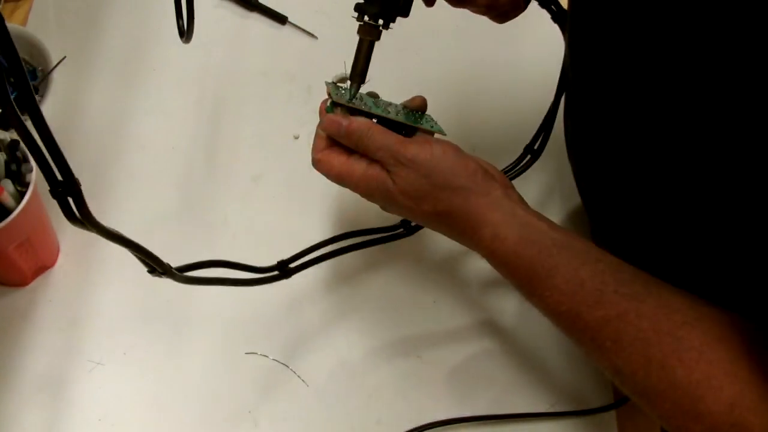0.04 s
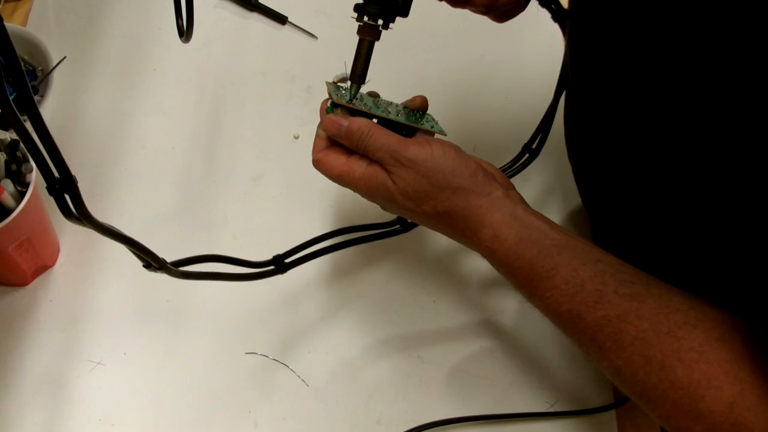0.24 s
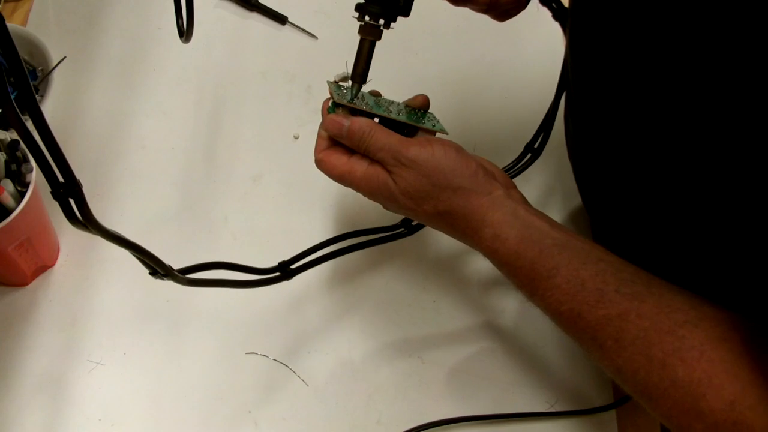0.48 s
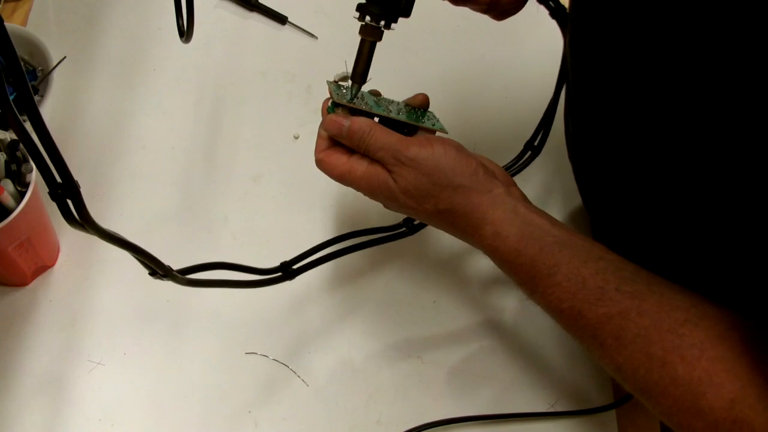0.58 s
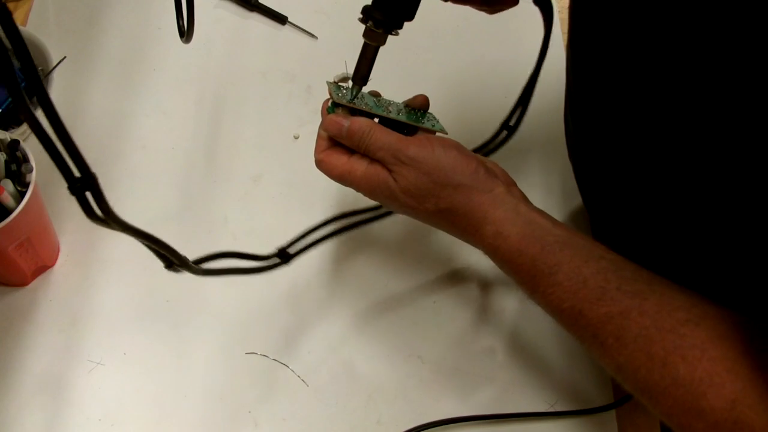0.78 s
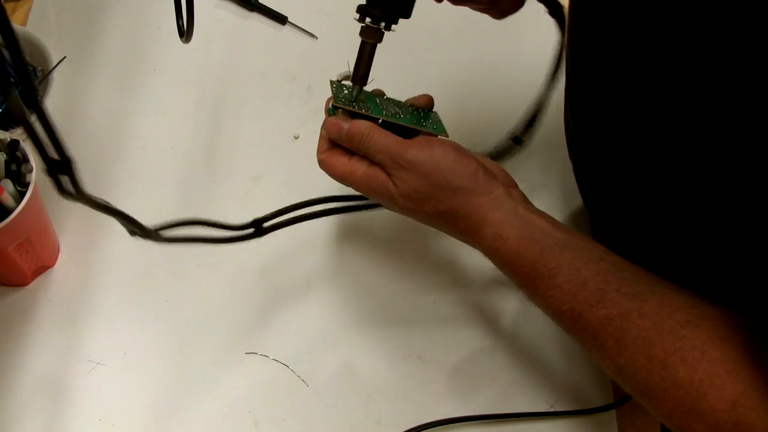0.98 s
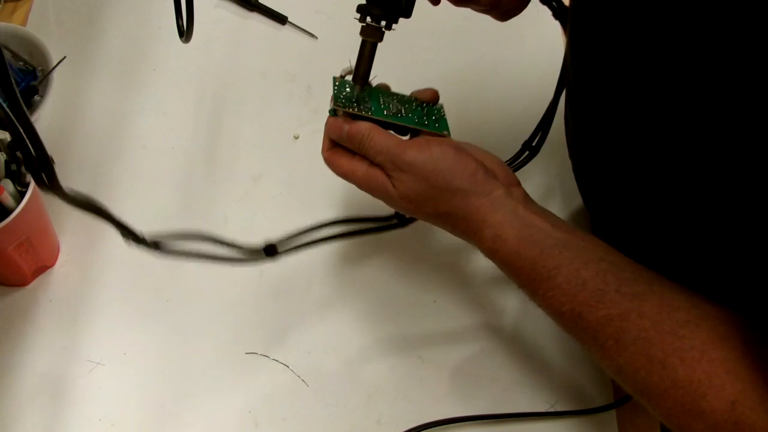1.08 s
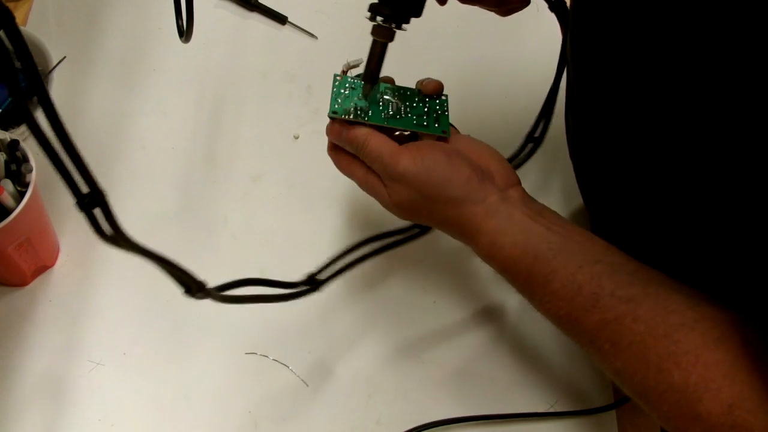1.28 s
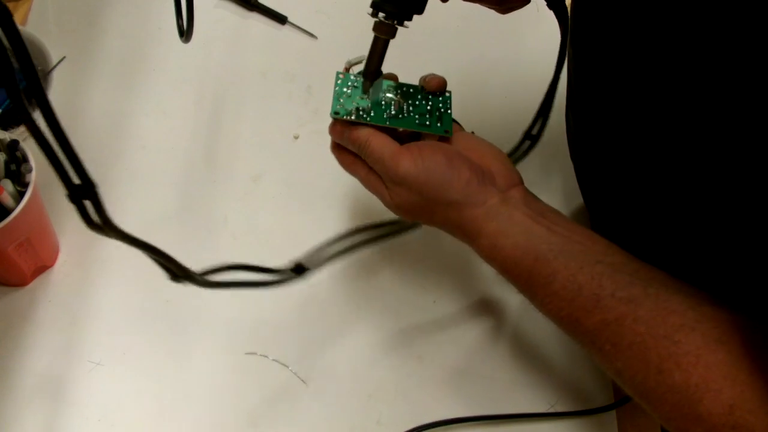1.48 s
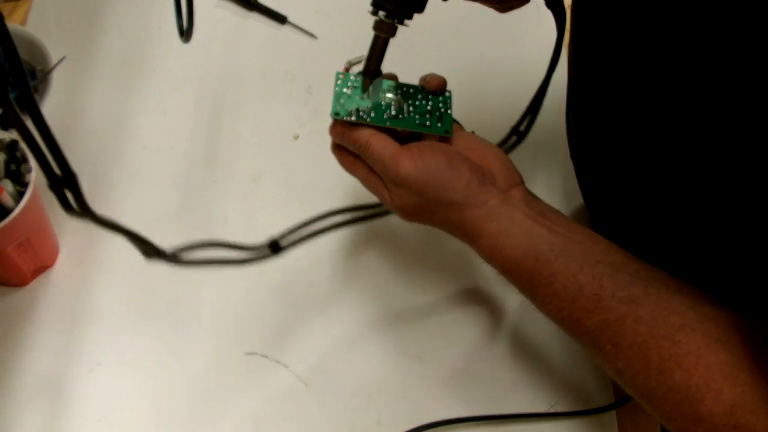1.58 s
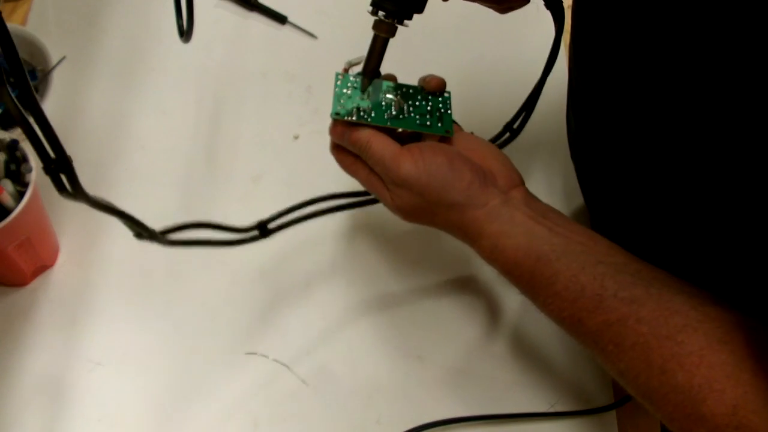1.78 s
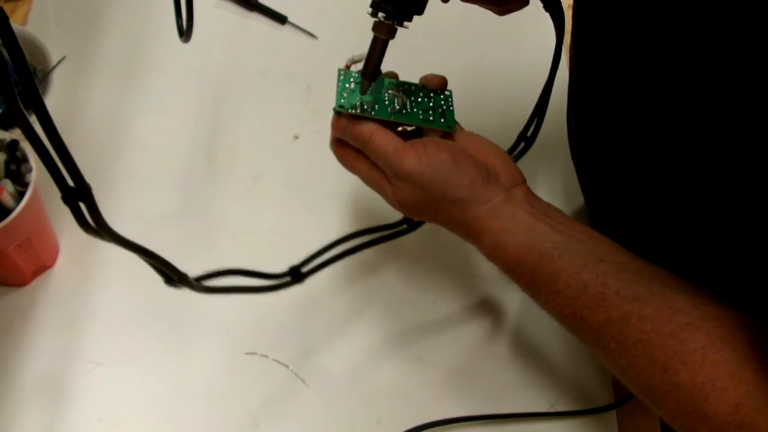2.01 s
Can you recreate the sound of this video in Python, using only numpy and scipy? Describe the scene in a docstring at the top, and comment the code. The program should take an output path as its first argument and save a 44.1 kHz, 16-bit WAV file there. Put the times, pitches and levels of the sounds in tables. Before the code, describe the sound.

Close stereo pickup in a small quiet workshop: a desoldering pump's trigger ticks and snaps, its motor buzzes steadily while air hisses into the nozzle, then it snaps off and leftover suction sighs away, thin and high.

```python
"""A mains-driven desoldering pump buzzes for under a second: a harmonic series plus a gated rattle.
Air hisses into its nozzle, as shaped noise; the leftover vacuum bleeds away in falling whistles.
The trigger ticks, snaps on and snaps off, as decaying modes with a crack of noise.
Behind lie faint bench knocks, a sine of transformer hum and the noise floor of a small quiet workshop."""
import sys
import numpy as np
from scipy import signal
from scipy.io import wavfile
from scipy.ndimage import uniform_filter1d

SR = 44100
rng = np.random.default_rng(int(sys.argv[2]) if len(sys.argv) > 2 else 0)


def store_pcm(level_fs):
    """Save levels as 16-bit WAV."""
    pcm = np.round(np.clip(level_fs, -1, 1) * 32767).astype(np.int16)
    wavfile.write(sys.argv[1], SR, np.atleast_2d(pcm).T)


def makeup_ratio(level_db):
    """Linear amplitude ratio for a level in decibels (20 dB per factor of ten)."""
    decades = np.asarray(level_db, float) / 20
    return 10 ** decades


N = 90404  # samples

MAINS_HZ = 60.02
# Pump envelope: t/s, buzz level/dB, rattle level/dB
PUMP_LEVELS = [(.228, -91, -76), (.25, -57, -54.5), (.27, -50.5, -51), (.3, -45.5, -56), (.4, -47.5, -58.5),
               (.5, -47, -62.5), (.6, -47.5, -61.5), (1.11, -48, -63), (1.135, -64, -62),
               (1.165, -64.5, -77), (1.2, -71.5, -68), (1.25, -88, -86)]
# The diaphragm overshoots as it starts and sags as it is released: t/s, share of full speed
PUMP_SPEED = [(.228, 1.15), (.26, 1.04), (.3, 1), (1.1, 1), (1.135, .95), (1.16, 1)]
# Buzz partials: multiple of the mains, level/dB
BUZZ_PARTIALS = [(1, -39), (2, 0), (3, -23.5), (4, -13), (5, -18.5), (6, -14.5), (7, -25.5), (8, -22.5),
                 (9, -31), (10, -28), (11, -22.5), (12, -19), (13, -17.5), (14, -13), (15, -34), (16, -21),
                 (17, -42), (18, -26), (19, -18.5), (20, -18.5), (21, -25), (22, -41), (23, -35), (24, -57),
                 (25, -52), (26, -39), (27, -12), (28, -25), (29, -22.5), (30, -25), (31, -19), (32, -48),
                 (33, -32), (34, -28), (35, -20.5), (36, -26)]
# Upper partials shift in level while the pump runs; most are strongest at the start, the late ones
# dip and then return: t/s, level change of most/dB, level change of the late ones/dB
UPPER_SHIFT = [(.25, 4, -1), (.33, -3, -4.5), (.4, 1.5, -16), (.48, -1, -12), (.56, 0.5, -1.5),
               (.62, 1, -1), (1.1, -1.5, 2)]
# Partials that follow the late column: multiple of the mains
LATE_PARTIALS = (14, 27, 35)
SHIFT_FROM, WAVER_DB = 9.5, 1.5  # partials above this multiple shift and waver; rms waver
# Loose rattle of the housing: f/Hz, width of one pass/Hz, level/dB
RATTLE_MODES = [(70, 75, -30), (320, 186, -8), (835, 300, -4.5), (1160, 130, -4.5), (1632, 98, -5),
                (1834, 240, -2.5), (2720, 650, -2.5)]
RATTLE_GATE = 0.1  # depth of modulation
PUMP_ROOM_DB, PUMP_ROOM_HZ = -15, 278  # the bass of the pump stays dry

# Air at the nozzle: t/s, broad hiss level/dB, treble level/dB
AIR_LEVELS = [(.222, -93, -72), (.235, -78, -70), (.26, -49.5, -52), (.32, -50.5, -43), (.55, -50.5, -42.5),
              (.86, -52.5, -44.5), (1.04, -50.5, -43), (1.07, -47, -40.5), (1.17, -51, -40.5),
              (1.3, -48.5, -38.5), (1.36, -49.5, -45), (1.44, -49.5, -44), (1.55, -49.5, -49),
              (1.64, -52.5, -52), (1.75, -53.5, -55.5), (1.88, -57.5, -56.5), (1.98, -60.5, -63.5),
              (2.05, -64.5, -63)]
# Broad hiss: f/Hz, relative level per Hz/dB
HISS_SPECTRUM = [(200, -45), (600, -13), (1500, -12), (2500, -8.5), (3000, -5.5), (5000, -4.5),
                 (9000, -1.5), (15000, -12)]
# Treble of the suction tube: f/Hz, relative level per Hz/dB
TREBLE_SPECTRUM = [(4000, -32), (6500, -18), (9000, -5.5), (11000, -8.5), (12300, -2), (14000, -7),
                   (15200, -6)]
# Resonances of nozzle and tube: f/Hz, width/Hz, level over the valleys/dB
TUBE_MODES = [(3005, 340, 5.5), (4350, 1500, 3.5), (5324, 600, 8), (6120, 84, 5), (7006, 910, 5),
              (8380, 290, 1.5), (9350, 300, 4.5), (10160, 180, 4), (10900, 160, -7), (11600, 150, 5.5),
              (12450, 470, 5), (13500, 540, 3), (14450, 200, 1.5), (14140, 120, 13)]
# Jet whistles as the vacuum bleeds away: t/s, upper f/Hz, upper level/dB, lower level/dB
JET_GLIDE = [(1.22, 13300, -70, -62), (1.33, 13000, -50, -50), (1.4, 12350, -45.5, -48.5),
             (1.46, 11600, -48, -51), (1.53, 10200, -54, -53), (1.62, 9450, -53.5, -56),
             (1.72, 8800, -63, -63), (1.82, 8500, -75, -72)]
JET_RATIO = 0.772  # lower whistle over upper
# Widths of upper and lower whistle: one pass of the resonance/Hz
JET_WIDTHS = (230, 550)
# Last sip of air as the nozzle lifts: t/s, f/Hz, level/dB
SIP_GLIDE = [(1.87, 14500, -69), (1.93, 13500, -56), (1.98, 12500, -51.5), (2.0, 12100, -62),
             (2.03, 10400, -65), (2.06, 9800, -50)]
SIP_WIDTH_HZ = 1200  # of one pass
PATCH_DB, JET_PATCH_DB, THROB_DB = 1.5, -1, .5  # rms of the drifting patches (twice); peak of the throb
ECHO_DB, ECHO_S = -7.5, .012  # board, hand and bench scatter the hiss

# Trigger clicks: t/s, level/dB, tilt/dB per octave, level of modes under BODY_HZ/dB,
# ring length/share, crack level/dB, pan/dB
CLICKS = [(0.1426, -38.5, 5.5, -17, 0.54, 1, 4.5), (0.2246, -22, 0, -0.5, 0.79, -3.5, 3),
          (1.055, -16.5, 1.5, -9, 0.46, -14, 3)]
# Trigger and handle modes: f/Hz, level/dB, t60 before the ring share/s
HANDLE_MODES = [(864, -20, 0.036), (1530, -22.5, 0.032), (2000, -17, 0.039), (3050, -21, 0.019),
                (3980, -16, .015), (4890, 0.5, 0.014), (6270, -7.5, 0.029), (7100, 1, 0.013),
                (9100, -30, .015), (10500, -25, 0.023), (10940, -9, 0.03), (12500, -34, .02),
                (13950, 3.5, .016), (16000, -28, .005)]
BODY_HZ, CLICK_TOP_HZ = 6600, 15800
# Edges of the crack: gentle lower f/Hz, steep upper f/Hz
CRACK_EDGES = (4500, 14800)
CRACK_T60_S, RISE_S = 0.044, 0.00019  # the decay time is before the ring share
# Faint knocks on the bench: t/s, level/dB, f/Hz, t60/s
KNOCKS = [(0.021, -57, 2300, .05), (.092, -62, 840, 0.063)]
ROOM_DB, ROOM_T60_S, ROOM_TOP_HZ = -12, .11, 14300  # level and top are for clicks and knocks

# Transformer hum: t/s, level/dB
HUM_LEVEL = [(0, -111), (.2, -109), (1.2, -74.5), (1.45, -75.5), (1.7, -79.5), (1.9, -87.5), (2.05, -100)]
# Noise floor: f/Hz, relative level per Hz/dB
FLOOR_SPECTRUM = [(40, -42), (200, -8), (500, -4.5), (900, -2.5), (2000, -12), (5000, -9), (10000, -13),
                  (15000, -17)]
FLOOR_DB = -71
EDGE_HZ = 15250  # top of the shaped noises
# Likeness of the noise at left and right: f/Hz, correlation
LIKENESS = [(60, 0.53), (700, 0.57), (1400, 0.77), (2800, 1), (5200, 1), (6200, 0.89), (8000, 0.72),
            (9200, 0.96), (10600, 0.18), (12400, 0.9), (14000, 0.77), (15200, 0.97)]
# Phase between the channels: f/Hz, left lead/rad
PHASE_LEAD = [(6000, -0.62), (9000, -0.64), (10300, -1.3), (11000, .1), (15000, 0.76)]
# Balance of the channels: f/Hz, left minus right/dB
BALANCE = [(300, -.3), (1400, 0), (4000, -0.9), (7200, 1.2), (8500, -1.5), (10400, 1.5), (12000, 0.6),
           (15000, 2)]


def pump():
    """Periodic forcing gives multiples of the mains; a gated noise excites the housing resonances."""
    level_db, rattle_db = curves(PUMP_LEVELS)
    speed = curves(PUMP_SPEED)[0]
    cycles = MAINS_HZ * np.cumsum(speed) / SR
    shift_db = curves(UPPER_SHIFT)
    buzz = np.zeros(N)
    for k, db in BUZZ_PARTIALS:
        change_db = shift_db[k in LATE_PARTIALS] + WAVER_DB * slow(25.1)
        partial_db = db + (k > SHIFT_FROM) * change_db
        buzz += makeup_ratio(partial_db) * np.sin(2 * np.pi * (k * cycles + rng.random()))
    # the gate opens twice per mains cycle
    shake = rng.standard_normal(N) * (1 + RATTLE_GATE * np.cos(4 * np.pi * cycles))
    rattle = evened(sum(makeup_ratio(db) * evened(resonate_twice(shake, hz, width))
                        for hz, width, db in RATTLE_MODES))
    return np.sqrt(2) * makeup_ratio(level_db) * buzz + makeup_ratio(rattle_db) * rattle


def air():
    """Turbulent flow makes broadband noise coloured by the tube; jet tones sink with the air speed."""
    hiss_db, treble_db = curves(AIR_LEVELS)
    jet_hz, upper_db, lower_db = curves(JET_GLIDE)
    sip_hz, sip_db = curves(SIP_GLIDE)
    white = noise([(100, 0), (20000, 0)], PATCH_DB)
    tubed = noise([(100, 0.0078), (20000, 0.0098)], JET_PATCH_DB, TUBE_MODES)

    hiss = makeup_ratio(hiss_db) * noise(HISS_SPECTRUM, PATCH_DB, TUBE_MODES)
    treble = makeup_ratio(treble_db) * noise(TREBLE_SPECTRUM, PATCH_DB, TUBE_MODES)
    throb = makeup_ratio(THROB_DB * np.cos(4 * np.pi * MAINS_HZ * np.arange(N) / SR))
    upper = whistle(white, JET_GLIDE, jet_hz, JET_WIDTHS[0], upper_db)
    lower = whistle(tubed, JET_GLIDE, jet_hz * JET_RATIO, JET_WIDTHS[1], lower_db)
    sip = whistle(white, SIP_GLIDE, sip_hz, SIP_WIDTH_HZ, sip_db)
    return scatter(throb * (hiss + treble)) + upper + lower + sip


def whistle(source, table, hz, width, level_db):
    """A gliding resonance selects a fuzzy tone from noise, silent outside its table."""
    t = np.arange(N) / SR
    start, end = table[0][0], table[-1][0]
    on = np.clip(np.minimum(t - start, end - t) / .02, 0, 1)
    return makeup_ratio(level_db) * evened(resonate_twice(source, hz, width)) * on


def scatter(x):
    """Interference of the direct sound with a handful of near reflections ripples the spectrum."""
    taps = np.zeros(round(ECHO_S * SR) + 1)
    taps[rng.integers(20, len(taps), size=14)] = rng.standard_normal(size=14)
    taps *= makeup_ratio(ECHO_DB) / np.linalg.norm(taps)
    taps[0] = 1  # direct sound
    return signal.lfilter(taps / np.linalg.norm(taps), 1, x)


def click(level_db, tilt_db, body_db, ring, crack_db, pan_db):
    """An impact excites all handle modes at once, each decaying exponentially, with a crack of noise."""
    t = np.arange(4000) / SR
    modes = np.zeros(len(t))
    for hz, db, t60 in HANDLE_MODES:
        start_db = db + tilt_db * np.log2(hz / 8000) + body_db * (hz < BODY_HZ)
        modes += makeup_ratio(start_db - 60 * t / (t60 * ring)) * np.sin(2 * np.pi * (hz * t + rng.random()))
    modes /= np.sqrt(np.mean(modes[:40] ** 2))  # rms 1 at the onset
    high_pass = signal.butter(2, CRACK_EDGES[0], "high", fs=SR)
    crack = band(signal.lfilter(*high_pass, rng.standard_normal(len(t))), CRACK_EDGES[1], "low")
    crack *= makeup_ratio(crack_db - 60 * t / (CRACK_T60_S * ring))
    struck = (modes + crack) * np.minimum(t / RISE_S, 1)
    sides_db = np.array([[.5], [-.5]]) * pan_db
    return makeup_ratio(level_db + sides_db) * band(struck, CLICK_TOP_HZ, "low")


def knock(level_db, hz, t60):
    """A heavily damped resonance of the bench: decaying noise in a wide band."""
    t = np.arange(3000) / SR
    ring = evened(resonate_twice(rng.standard_normal(len(t)), hz, hz / 4))
    return np.ones((2, 1)) * makeup_ratio(level_db - 60 * t / t60) * ring * np.minimum(t / 0.0035, 1)


def room(x):
    """Reverberation as convolution with sparse, exponentially decaying taps of random sign."""
    at = np.arange(200, SR // 2, 20)
    at = at + rng.integers(0, 20, (2, len(at)))
    taps = np.zeros((2, SR // 2 + 20))
    np.put_along_axis(taps, at, rng.choice([-1., 1.], at.shape), 1)
    taps *= makeup_ratio(-60 * np.arange(taps.shape[1]) / SR / ROOM_T60_S)
    return signal.fftconvolve(x, taps / np.linalg.norm(taps[0]), axes=1)[:, :N]


def hum():
    """A transformer sounds at twice the mains frequency: one faint sine."""
    t = np.arange(N) / SR
    return np.sqrt(2) * makeup_ratio(curves(HUM_LEVEL)[0]) * np.sin(2 * np.pi * 2 * MAINS_HZ * t)


def workshop_floor():
    """Steady background noise is a random process of fixed spectrum with drifting patches."""
    return makeup_ratio(FLOOR_DB) * noise(FLOOR_SPECTRUM, 2.8)


def noise(spectrum, patch_db, peaks=()):
    """Partly coherent two-channel noise with resonances, as heard through a close pair of ports."""
    frames, hz = N // 128 + 5, np.fft.rfftfreq(512, 1 / SR)
    a, b, c, d, patches = rng.standard_normal((frames, 257, 5)).T
    # smooth over frequency, then over time
    patches = uniform_filter1d(uniform_filter1d(patches, size=4, axis=0), size=24, axis=1)
    patches = evened(patches)
    same = np.clip(read(LIKENESS, hz), -1, 1)[:, None]
    left = a + 1j * b
    right = same * left + np.sqrt(1 - same ** 2) * (c + 1j * d)
    # half of the balance and phase goes to either side
    half = (makeup_ratio(read(BALANCE, hz) / 2) * np.exp(.5j * read(PHASE_LEAD, hz)))[:, None]
    shape_db = read(spectrum, hz)
    for f, width, db in peaks:
        shape_db = shape_db + db * np.exp(-(2 * (hz - f) / width) ** 2)
    edge = np.clip((EDGE_HZ - hz[:, None]) / 90 + .5, 0, 1)
    z = np.array([left * half, right / half]) * makeup_ratio(shape_db[:, None] + patch_db * patches) * edge
    return evened(signal.istft(z, nperseg=512, noverlap=384)[1][:, :N])


def resonate(x, hz, width):
    """A resonance of gain 1: shift the curve hz to zero, low-pass, shift back."""
    turn = np.exp(2j * np.pi * np.cumsum(hz * np.ones(x.shape[-1])) / SR)
    r = np.exp(-np.pi * width / SR)
    return 2 * (turn * signal.lfilter([1 - r], [1, -r], x / turn)).real


def resonate_twice(x, hz, width):
    """Two equal resonances in series steepen the skirts."""
    return resonate(resonate(x, hz, width), hz, width)


def band(x, hz, kind):
    """A sixth-order Butterworth filter: flat passband, steep skirt."""
    return signal.sosfilt(signal.butter(6, hz, kind, fs=SR, output="sos"), x)


def slow(rate_hz):
    """Superposed slow sines of random phase give a wander of rms 1."""
    t = np.arange(N) / SR
    return evened(sum(np.sin(2 * np.pi * (f * t + rng.random())) / np.sqrt(f)
                      for f in np.geomspace(1, rate_hz, num=16)))


def evened(x):
    """Normalises the mean power: rms 1."""
    return x / np.sqrt(np.mean(x ** 2) + 1e-20)


def read(points, hz):
    """Interpolates a spectrum on a logarithmic frequency axis."""
    f, value = np.transpose(points)
    return np.interp(np.log(hz + 1), np.log(f + 1), value)


def curves(table):
    """Interpolates every column after time linearly, sample by sample."""
    s, *columns = np.transpose(table)
    return [np.interp(np.arange(N) / SR, s, column) for column in columns]


def add(mix, s, sound):
    """Superposes a sound on the mix at time s."""
    part = mix[:, round(s * SR):][:, :sound.shape[1]]
    part += sound[:, :part.shape[1]]


def scene():
    """Linear superposition of pump, hum, air, clicks and knocks, their room and the floor."""
    hits = np.zeros((2, N))
    for s, *settings in CLICKS:
        add(hits, s, click(*settings))
    for s, *settings in KNOCKS:
        add(hits, s, knock(*settings))
    motor = pump()
    motor_send = makeup_ratio(PUMP_ROOM_DB) * band(motor, PUMP_ROOM_HZ, "high")
    hits_send = makeup_ratio(ROOM_DB) * band(hits, ROOM_TOP_HZ, "low")
    return motor + hum() + air() + hits + room(motor_send + hits_send) + workshop_floor()


def low_pass(x):
    """Removes everything above the highest recorded frequency."""
    return signal.sosfilt(signal.butter(12, 16650, fs=SR, output="sos"), x)


def record(dry):
    """The finished mix is the superposed sound field, with no further gain."""
    return low_pass(dry)


dry = scene()
out = record(dry)
store_pcm(out)
```